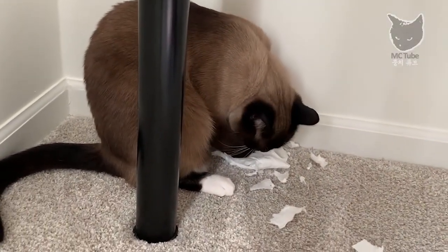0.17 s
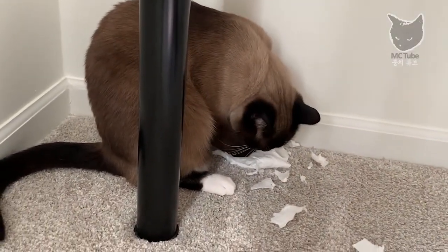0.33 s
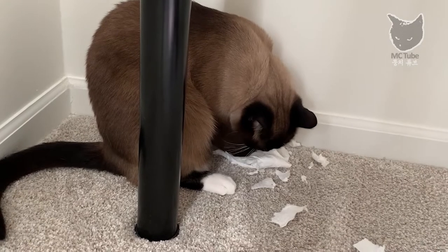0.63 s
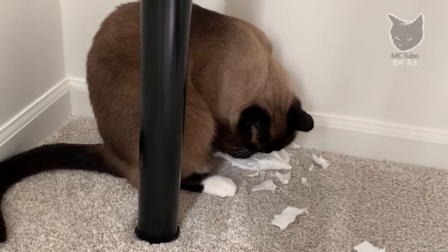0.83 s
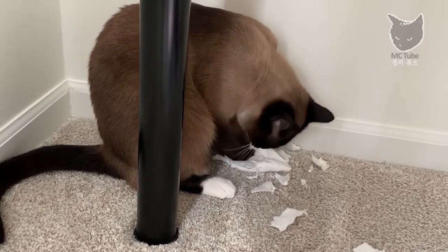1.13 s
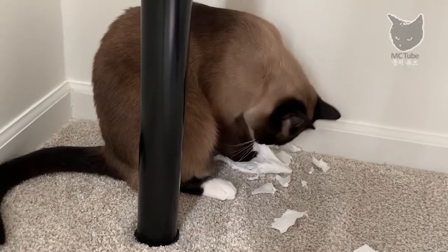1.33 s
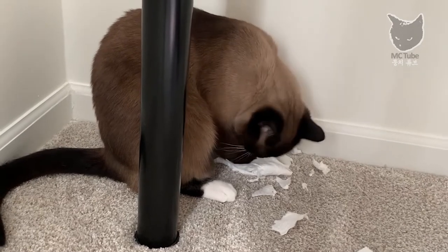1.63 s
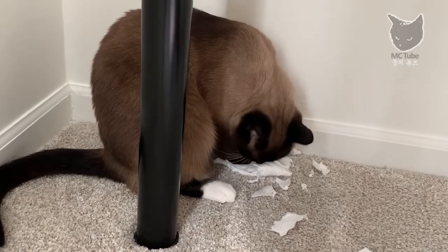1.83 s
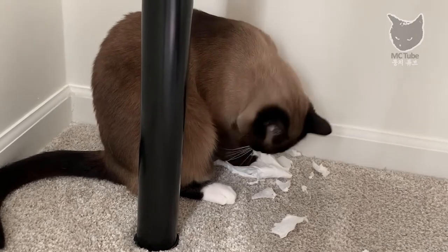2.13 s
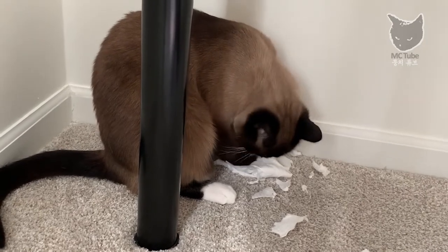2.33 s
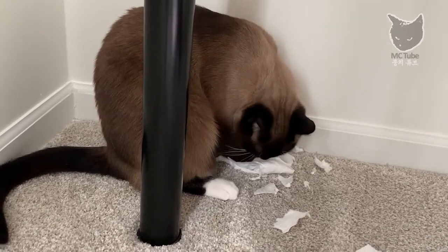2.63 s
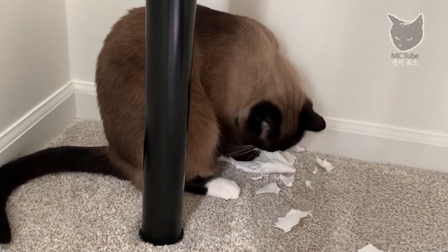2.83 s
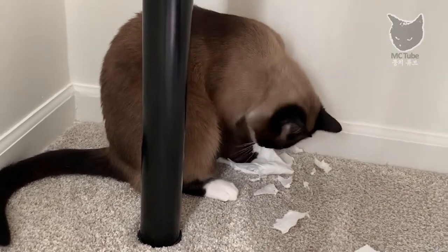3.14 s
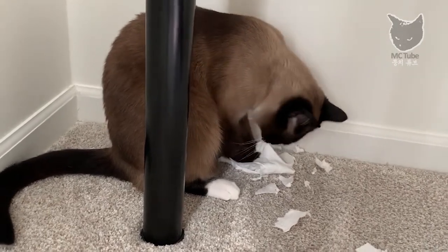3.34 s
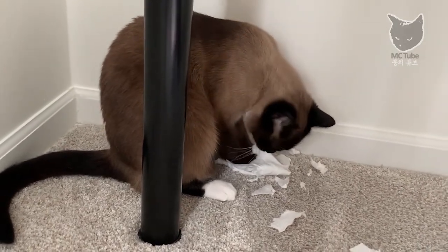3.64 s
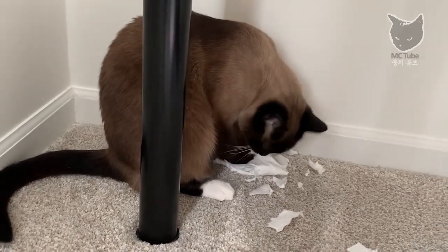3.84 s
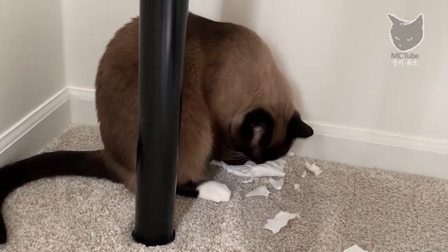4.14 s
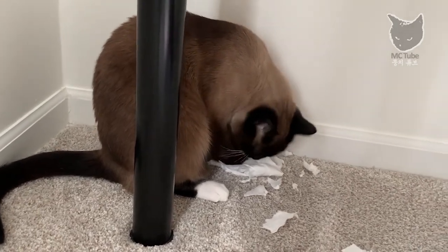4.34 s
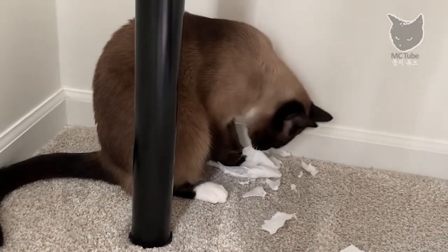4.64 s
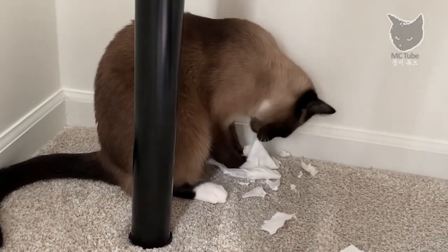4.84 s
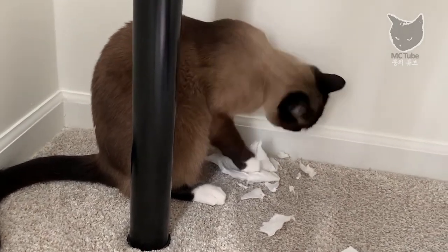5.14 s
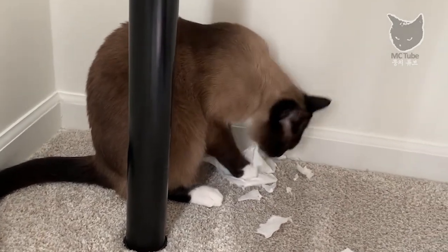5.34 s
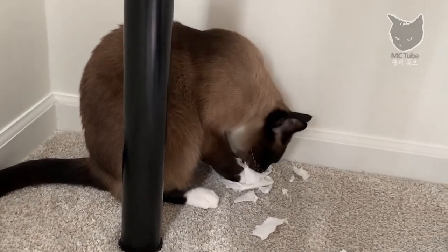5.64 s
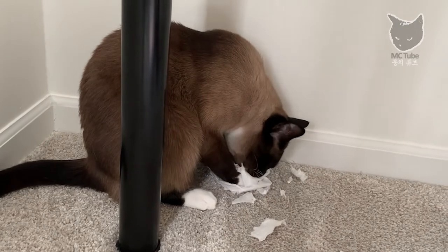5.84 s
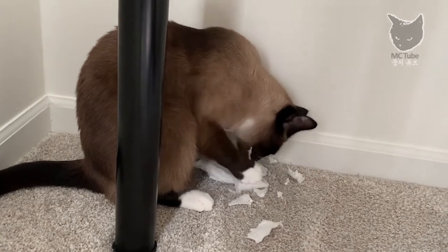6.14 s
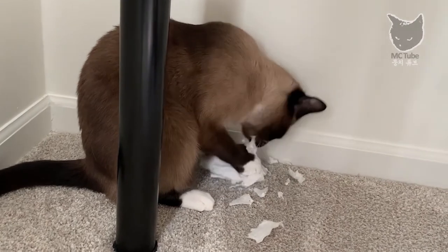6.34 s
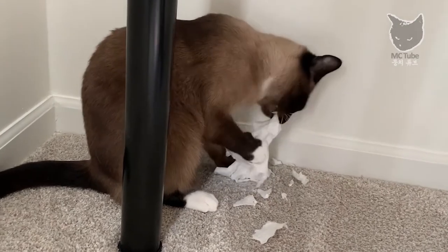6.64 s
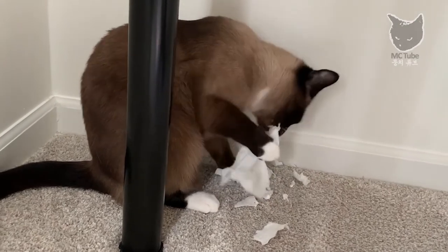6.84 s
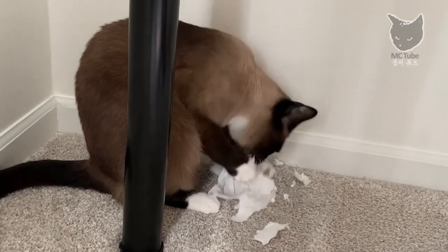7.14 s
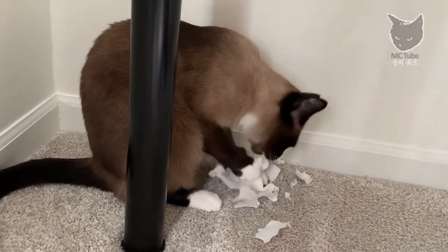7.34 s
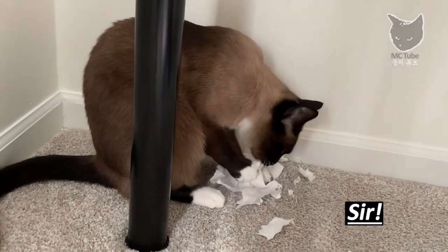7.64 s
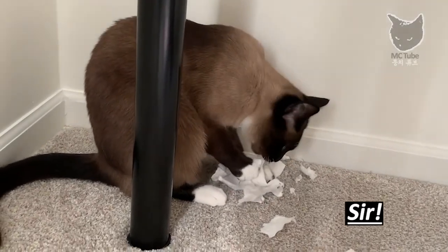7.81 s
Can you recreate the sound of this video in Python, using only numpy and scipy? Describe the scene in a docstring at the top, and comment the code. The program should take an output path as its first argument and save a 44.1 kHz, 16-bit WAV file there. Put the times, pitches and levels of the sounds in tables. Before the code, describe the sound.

Sparse bites and hollow snaps of soft paper give way to longer, crisp, uneven tearing by a cat, above steady low hum and rumble.

```python
"""A carpeted corner of a small room, a cat with a paper towel, a two-port microphone.
The first four seconds are nosing, bites and tugs: clumped clicks ring the sheet and the mouth hollow, short
bursts make hollow pops (a knot of them near 3 s) and low thumps of paws and room, and tooth squeaks glide.
Long rips of denser clicks follow from 4.3, 6 and 7.1 s, with wet ticks mostly from 5 to 6 s, then soft nosing.
Room echo follows each sound; mains hum, noise-driven rumble and a faint hiss run underneath throughout."""
import sys
import numpy as np
from scipy import signal
from scipy.fft import rfft, irfft, next_fast_len
from scipy.io import wavfile
from scipy.ndimage import uniform_filter1d

SR = 44100
rng = np.random.default_rng(int(sys.argv[2]) if len(sys.argv) > 2 else 0)


def to_wav(s):
    """Save 16-bit WAV."""
    ch = np.atleast_2d(s).T  # columns
    pcm = np.round(np.clip(ch, -1, 1) * 32767)  # PCM
    wavfile.write(sys.argv[1], SR, pcm.astype(np.int16))


N = 351544  # samples

# Long rips, one curve each: [t/s, tearing level/dB, fibres over creases/dB, wad over creases/dB,
# drag of sheet and paws on the carpet: level/dB]; the fibres get FIBRE_LIFT_DB on top
RIP_CURVES = [
    [(4.305, -77, 0, 2, -87), (4.36, -64.5, -3, 7.5, -71.5), (4.43, -68.5, -3.5, 6, -71),
     (4.475, -52.5, -12.5, 4, -45.5), (4.52, -47.5, -8, -0.5, -44), (4.58, -60, -1, 4.5, -71),
     (4.61, -47, -6, 1, -63), (4.684, -57, -0.5, 8, -59), (4.71, -47.5, -1.5, 7, -44.5),
     (4.75, -54, -2.5, 4, -49.5), (4.77, -50.5, -2, 3.5, -45.5), (4.814, -57.5, -3.5, 8.5, -51),
     (4.864, -42, 0, -1.5, -38.5), (4.895, -47, -2, -2, -43.5), (4.94, -51.5, -1, 6, -49.5),
     (4.956, -66, -8.5, 2.5, -55.5), (5.054, -81, 6.5, 2.5, -69.5)],
    [(5.96, -75.5, 0.5, 6, -59.5), (5.985, -55, -13.5, -7, -43), (6.02, -58, -5.5, -3.5, -53),
     (6.05, -57.5, -8, 6, -49.5), (6.12, -58, -4.5, 5, -58), (6.17, -53.5, -4, 5.5, -54),
     (6.19, -47, -2, 3.5, -46.5), (6.25, -45.5, 1, 3.5, -42), (6.31, -44, 2, 4, -37),
     (6.4, -41, 1, 2.5, -41.5), (6.44, -44, 2, 8.5, -34), (6.484, -45, -2.5, -0.5, -40),
     (6.531, -38.5, 4, 3.5, -41.5), (6.556, -40, 3, 2.5, -33.5), (6.625, -59.5, -5, 2.5, -62),
     (6.69, -61, -3.5, -2.5, -56.5), (6.73, -69, -1, 6.5, -58.5), (6.9, -77, 9.5, -1, -67.5)],
    [(7.1, -69.5, -1, 1.5, -66.5), (7.147, -65, 1, 2.5, -61), (7.195, -47.5, -4.5, 2, -41.5),
     (7.214, -54.5, -6, 0, -60), (7.26, -60, -8.5, 0, -57.5), (7.313, -58.5, -8.5, -1.5, -54.5),
     (7.383, -61.5, -9.5, -0.5, -58), (7.41, -73, -3, 3.5, -52), (7.46, -80.5, 0, 4, -75.5)],
]
# Single bites and tugs: [peak t/s, width for a 20 dB fall/s, chewing level/dB, creasing level/dB, drag level/dB]
BITES = [(0.16, 0.0519, -74, -77, -55.5), (0.79, 0.0388, -53.5, -62.5, -76), (0.83, 0.0459, -49, -57, -80),
         (0.864, 0.0392, -54, -58.5, -78), (0.96, 0.011, -68, -67, -74), (1.084, 0.0756, -57.5, -65, -67),
         (1.185, 0.0042, -59.5, -73.5, -61.5), (1.218, 0.0148, -48, -60, -47.5),
         (1.24, 0.04, -60.5, -76.5, -51), (1.816, 0.0875, -65, -74.5, -57.5),
         (1.985, 0.0443, -60.5, -67, -75), (2.012, 0.0005, -75, -66, -43.5),
         (2.052, 0.0088, -40.5, -60.5, -56), (2.084, 0.0761, -56, -76.5, -50.5),
         (2.575, 0.0573, -69.5, -80, -80), (2.654, 0.0851, -59.5, -73.5, -64),
         (2.75, 0.0615, -57, -66, -62.5), (3.013, 0.0338, -50, -59.5, -51.5), (3.083, 0.032, -53, -61, -78),
         (3.144, 0.0204, -40, -45.5, -50), (3.163, 0.022, -46.5, -48.5, -47.5),
         (3.23, 0.0283, -51.5, -62, -61.5), (3.252, 0.0329, -61, -75.5, -49.5),
         (3.607, 0.0933, -89, -86.5, -58.5), (3.906, 0.0065, -82, -84, -58),
         (4.21, 0.0556, -56.5, -72.5, -67), (5.81, 0.2736, -64, -66, -67.5),
         (7.01, 0.14, -65.5, -69.5, -64.5)]
# Soft nosing and mouthing between bites: [t/s, level/dB before the offsets below]
NOSING = [(0, -81), (0.22, -91), (0.65, -74.5), (0.72, -85.5), (0.97, -70.5), (1.17, -72), (1.3, -90),
          (1.75, -76), (1.95, -72), (2.2, -83.5), (2.53, -86.5), (2.62, -72), (2.82, -77), (2.98, -68),
          (3.3, -93), (3.9, -85.5), (4.03, -73.5), (4.15, -79), (5.15, -84.5), (5.45, -75.5), (5.75, -70),
          (5.93, -74), (6.8, -73), (7.1, -70), (7.56, -70), (7.75, -76.5), (7.97, -76.5)]
# Offsets of the nosing for creases, fibres, wad, drag: [level/dB]
NOSING_OFFSETS = [-3.5, -3.5, 2, 2]
# Spectrum of the creasing sheet: [f/Hz, relative level/dB per Hz]
CREASE_SPECTRUM = [(1750, -8), (2150, -2.5), (2600, -3.5), (3000, -4.5), (3350, -1.5), (3700, -3),
                   (4200, -1), (4750, -5.5), (5150, -4), (5600, -10.5), (6400, -6.5), (7500, -29)]
# Spectrum of the parting fibres: [f/Hz, relative level/dB per Hz]
FIBRE_SPECTRUM = [(4000, -22.5), (6500, 1), (7500, 1), (8500, 0.5), (10000, -1.5), (11500, -8),
                  (13500, -1.5), (15700, -7)]
# Hollow of mouth and wad, close to the wall: [f/Hz, width of one pass/Hz, relative level/dB]
MOUTH_MODES = [(770.47, 200.2, -9.5), (895.87, 333.66, 7.5), (1016.3, 155.52, 4.5), (1545.7, 235.1, 1)]
# Resonances of the dragging on carpet: [f/Hz, width of one pass/Hz, relative level/dB]
CARPET_MODES = [(167.79, 106.5, -2), (229.09, 101.42, 2), (291.28, 50.57, 0.5), (411.72, 87.62, -2)]
# Left-right likeness of the paper at the two ports: [f/Hz, likeness (no unit)]
PAPER_LIKENESS = [(200, 0.8349), (1000, 0.7189), (2400, 0.6251), (4400, 0.7148), (6200, 0.084),
                  (7600, 0.5478), (15800, 1)]
# The sheet snapping off the teeth: [t/s, peak level/dB, f/Hz, level of the fixed 1.5 kHz resonance/dB,
# crack level above 2 kHz/dB, thud level under 500 Hz/dB]
POPS = [(1.082, -45.5, 989.5, -64, -63, -56), (1.212, -19.5, 831.2, -39.5, -47, -38),
        (1.812, -52, 615.3, -69, -71, -53.5), (2.048, -16, 936.1, -26.5, -34.5, -22.5),
        (2.651, -42.5, 861.9, -70.5, -69, -62.5), (2.999, -40, 999.3, -63.5, -62.5, -59),
        (3.013, -37.5, 833.7, -64, -57, -44), (3.024, -36, 998.8, -63.5, -64, -55),
        (3.056, -46.5, 998, -69.5, -61, -59.5), (3.087, -43, 841.5, -69.5, -61, -64.5),
        (3.139, -29.5, 994.2, -47.5, -47, -39.5), (3.211, -49.5, 895.8, -64, -62, -52),
        (3.24, -29, 859.1, -43.5, -49, -31), (4.211, -46.5, 878, -67.5, -70, -69),
        (4.396, -44.5, 986.9, -61.5, -62.5, -65.5), (4.471, -47.5, 942.8, -48.5, -46, -41.5),
        (4.623, -38, 1081, -56.5, -49.5, -51.5), (4.862, -41, 691.8, -34, -39, -28.5),
        (5.983, -50, 660.7, -57.5, -53, -44.5), (6.051, -44, 676.2, -60.5, -58, -44.5),
        (6.143, -36.5, 976.3, -60.5, -54, -42), (6.554, -29, 793.3, -45.5, -37.5, -44),
        (7.194, -43.5, 1034, -63.5, -43.5, -30), (7.313, -50, 678.3, -63, -50, -55.5),
        (7.383, -54, 801.4, -63.5, -50, -55.5)]
# Resonances of the taut sheet: [f/Hz, width of one pass/Hz, relative level/dB]
CRACK_MODES = [(2798, 342, 1.5), (3712.2, 313.4, -2.5), (4896.2, 636, -12), (6648.2, 396.2, -4)]
# Small wet ticks of tongue and teeth: [t/s, peak level/dB, f/Hz]
TICKS = [(4.03, -56.5, 3000), (5.093, -55.5, 9816), (5.111, -48.5, 9106), (5.194, -46, 6709),
         (5.974, -52, 3301), (5.986, -39.5, 5261), (5.045, -58.5, 6990), (6.0, -54, 5050)]
# Faint squeaks of tooth on damp paper: [t/s, length/s, peak level/dB, start f/Hz, end f/Hz]
SQUEAKS = [(1.668, 0.0718, -65, 1990, 2240), (1.955, 0.06736, -66.5, 2160, 2177),
           (2.048, 0.0437, -57, 2195, 2104), (4.33, 0.04002, -62.5, 3350, 3196)]
# Low thumps: paws shifting weight, and the room's low boom after hard snaps and tugs: [t/s, peak level/dB, f/Hz]
LOW_THUMPS = [(0.158, -58, 152.7), (1.107, -34.5, 122.3), (2.007, -40.5, 219.9), (2.062, -31.5, 77.28),
              (3.254, -34, 79.97), (3.605, -31.5, 101.9), (3.909, -37.5, 104.5), (5.975, -30.5, 158.2),
              (6.034, -27.5, 69.16), (6.56, -32, 68.47)]
# Decay of the room echo: [f/Hz, t60/s]
ROOM_DECAY = [(200, 0.4846), (1000, 0.1225), (4000, 0.3051), (12000, 0.0726)]
# Low room modes: [f/Hz, width of one pass/Hz, relative level/dB]
ROOM_MODES = [(55.576, 6.893, -2.5), (72.703, 7.003, -3), (90.902, 11.907, -9), (115.3, 21.385, -14)]
# Left-right likeness of hiss and echo at the two ports: [f/Hz, likeness (no unit)]
DIFFUSE_LIKENESS = [(60, 0.929), (300, 0.5038), (1000, 0.094), (2000, 0.1022), (6000, 0.14), (7600, 1),
                    (15800, 1)]
# Spectrum of the hiss: [f/Hz, relative level/dB per Hz]
HISS_SPECTRUM = [(60, -21), (140, 4.5), (200, -9), (400, -12.5), (1000, -20), (3300, -25), (6800, -29),
                 (8800, -24), (11500, -27.5), (13500, -25), (15700, -34)]
# Phase lead of the right port, negative where it lags; in the treble it grows like a fixed
# path difference: [f/Hz, lead/radians]
PORT_LEAD = [(0, 0), (1000, -.45), (1700, -1.1), (2400, -.4), (3700, -.9), (5600, -.7), (7000, -2.6),
             (9300, 0), (14100, 6.28), (16000, 8.8)]

BITE_RISE, BITE_ROUND = 1.0697, 1.4948  # rise as a share of the width; roundness of the top
BITE_BRIGHT_DB, FIBRE_LIFT_DB = -3.5, 2.5  # fibres over creases in a bite; lift of all fibres
MAINS_HZ, MAINS_DB = 59.901, -44  # f/Hz, rms level/dB before its slow wander
RUMBLE_DB, HISS_DB = -41, -62  # levels/dB ahead of the microphone's filters
EDGE_HZ = 15800  # upper band limit


def paper():
    """Clumped clicks drive the creasing sheet, the parting fibres, the mouth hollow and the carpet."""
    crease_gain, fibre_gain, wad_gain, drag_gain = effort()
    slips = lumps(0.004049, 1.2606)  # the tear runs in jerks
    # a fast rip packs the clicks into a finer grain
    pace = np.clip(fibre_gain / gain_of(-46), .25, 3)
    creases = colour(grains(6000 * pace, 1.7425), CREASE_SPECTRUM)
    creases = evened(patches(creases, 2.845)) * crease_gain * slips
    fibres = colour(grains(12000, 4.586), FIBRE_SPECTRUM)
    fibres = evened(patches(fibres, 2.848)) * fibre_gain * gain_of(FIBRE_LIFT_DB) * slips
    wad = evened(modes(grains(2500 * pace, 2.444), MOUTH_MODES))
    wad = wad * wad_gain * slips * lumps(0.0033, 0.462)
    drag = evened(modes(grains(600, 3.4246), CARPET_MODES))
    drag = drag * drag_gain * lumps(0.00629, 1.657)
    left, twin = creases + fibres + wad + drag
    return pair(left, twin, PAPER_LIKENESS)


def effort():
    """Gains of creases, fibres, wad and drag: the loudest of nosing, bites and rips at each moment."""
    t = np.arange(0, N / SR + .002, 1 / 1000)
    db = np.interp(t, *np.transpose(NOSING)) + np.c_[NOSING_OFFSETS]
    for s, width, chew_db, crease_db, drag_db in BITES:
        away = np.where(t < s, (s - t) / BITE_RISE, t - s)
        fall = 20 * (away / width) ** BITE_ROUND
        peaks = np.c_[[crease_db, crease_db + BITE_BRIGHT_DB, chew_db, drag_db]]
        db = np.maximum(db, peaks - fall)
    for curve in RIP_CURVES:
        s, *columns = np.transpose(curve)
        tear, fibres, wad, drag = (np.interp(t, s, column) for column in columns)
        louder = np.maximum(db, [tear, tear + fibres, tear + wad, drag])
        db = np.where((t > s[0]) & (t < s[-1]), louder, db)
    return [gain_of(np.interp(np.arange(N) / SR, t, row)) for row in db]


def pops():
    """A short hollow pop with a fixed higher ring near 1.5 kHz, a crack of the taut sheet, then a soft thud."""
    out = np.zeros(N)
    click = np.zeros(400)
    click[0] = 1
    crack = modes(click, CRACK_MODES)
    crack /= abs(crack).max()
    for s, db, hz, ring_db, crack_db, thud_db in POPS:
        add(out, s - .0006, gain_of(db) * burst(hz, 4.68))
        add(out, s - .0003, gain_of(ring_db) * burst(1510.9, 6.835))
        add(out, s, gain_of(crack_db) * crack)
        add(out, s + 0.0022976, gain_of(thud_db) * burst(265.5, 1.1173))
    return out


def ticks():
    """Tongue and teeth part wetly: each tick is a dozen high cycles."""
    out = np.zeros(N)
    for s, db, hz in TICKS:
        add(out, s, gain_of(db) * burst(hz, 12.63))
    return out


def squeaks():
    """Tooth slides on damp paper: a short sine glide with an unsteady pitch."""
    out = np.zeros(N)
    for s, length, db, start_hz, end_hz in SQUEAKS:
        glide = np.linspace(start_hz, end_hz, round(length * SR))
        # the slip stutters, 90 Hz rms
        glide += 90 * evened(uniform_filter1d(rng.standard_normal(len(glide)), size=120))
        tone = np.sin(2 * np.pi * np.cumsum(glide) / SR)
        add(out, s, gain_of(db) * tone * np.hanning(len(glide)))
    return out


def low_thumps():
    """Paws shift weight, or the room booms low after a hard snap or tug: about three low cycles each."""
    out = np.zeros(N)
    for s, db, hz in LOW_THUMPS:
        add(out, s, gain_of(db) * burst(hz, 2.9084))
    return out


def room(x):
    """Echo as sparse taps of random sign, each band dying at its own speed, other taps per port."""
    taps = np.zeros((2, SR // 2))
    # one tap in every 20 samples
    at = np.arange(200, SR // 2 - 20, 20) + rng.integers(0, 20, (2, (SR // 2 - 201) // 20))
    np.put_along_axis(taps, at, rng.choice([-1., 1.], at.shape), 1)
    hz, t, z = signal.stft(taps, SR, nperseg=256)
    decay = gain_of(-60 * t / read(ROOM_DECAY, hz)[:, None])
    tail = signal.istft(z * decay, SR, nperseg=256)[1]
    return signal.fftconvolve(x, tail / np.linalg.norm(tail[0]), axes=1)[:, :N]


def rumble():
    """The building's low rumble: noise in the low room modes, nearly alike at both ports."""
    a, b = rng.standard_normal((2, N))
    noise = np.array([a + 0.2509 * b, a - 0.0814 * b])
    return gain_of(RUMBLE_DB) * evened(modes(noise, ROOM_MODES)) * lumps(0.0873, 1.982)


def mains_hum():
    """One sine at the mains frequency, its level wandering slowly, the same at both ports."""
    t = np.arange(N) / SR
    tone = np.sqrt(2) * np.sin(2 * np.pi * MAINS_HZ * t)
    return gain_of(MAINS_DB) * tone * lumps(0.3471, 2.573)


def hiss():
    """Steady coloured noise, its likeness between the ports set by frequency."""
    c, d = rng.standard_normal((2, N))
    return gain_of(HISS_DB) * evened(colour(pair(c, d, DIFFUSE_LIKENESS), HISS_SPECTRUM))


def gain_of(db):
    """dB to gain."""
    return 10 ** (np.asarray(db) / 20)


def evened(x):
    """Scales to rms 1."""
    return x / np.sqrt(np.mean(x ** 2) + 1e-20)


def read(points, hz):
    """Reads a spectrum table on a log-frequency axis."""
    f, value = np.transpose(points)
    return np.interp(np.log(hz + 1), np.log(f + 1), value)


def add(mix, s, sound):
    """Mixes a sound in at s seconds."""
    part = mix[round(s * SR):][:len(sound)]
    part += sound[:len(part)]


def modes(x, table):
    """Sum of resonances, each applied twice for dark valleys between them."""
    out = 0
    for hz, width, db in table:
        pole = np.exp((2j * np.pi * hz - np.pi * width) / SR)
        b, a = [1 - abs(pole)], [1, -pole]
        once = signal.lfilter(b, a, x, axis=-1)
        out = out + gain_of(db) * signal.lfilter(b, a, once, axis=-1).real
    return out


def colour(x, points):
    """Filters by a spectrum table."""
    size = next_fast_len(x.shape[-1])
    gain = gain_of(read(points, np.fft.rfftfreq(size, 1 / SR)))
    return irfft(rfft(x, size) * gain, size)[..., :x.shape[-1]]


def patches(x, depth_db):
    """Colour that drifts as the sheet changes shape: random patches over time and frequency."""
    z = signal.stft(x, SR, nperseg=512, noverlap=384)[2]
    field = rng.standard_normal(z.shape[-2:])
    field = uniform_filter1d(field, size=3, axis=0)
    field = evened(uniform_filter1d(field, size=24, axis=1))
    return signal.istft(z * gain_of(depth_db * field), SR, nperseg=512, noverlap=384)[1][..., :N]


def pair(x, other, points):
    """Two microphone ports: the right one hears a share of the left and a share of a second signal."""
    size = next_fast_len(N)
    same = np.clip(read(points, np.fft.rfftfreq(size, 1 / SR)), -1, 1)
    right = irfft(same * rfft(x, size) + np.sqrt(1 - same ** 2) * rfft(other, size), size)
    return np.array([x, right[:N]])


def lumps(seconds, depth_db):
    """Random gain that wanders on the given time scale."""
    size = max(round(seconds * SR), 2)
    smooth = uniform_filter1d(uniform_filter1d(rng.standard_normal(N), size), size)
    return gain_of(depth_db * evened(smooth))


def grains(per_s, spread_db):
    """Two sparse trains of clicks of random sign, a few of them large, at steady mean power."""
    size = gain_of(spread_db * np.minimum(rng.exponential(1, (2, N)), 4))
    signed = size * rng.choice([-1., 1.], (2, N))
    return signed * (rng.random((2, N)) < per_s / SR) / np.sqrt(per_s)


def burst(hz, cycles):
    """A few cycles swelling and dying, peak about 1."""
    t = np.arange(round(cycles * SR / hz)) / SR
    return np.sin(2 * np.pi * hz * t) * np.sin(np.pi * t * hz / cycles) ** 2


def scene():
    """The cat in its corner, the room's answer and the background."""
    hits = pops() + ticks() + squeaks() + low_thumps()
    hits = hits * gain_of([[.3], [-.3]])  # slightly louder at the left port
    sheet = paper()
    echo = pair(*room(gain_of(-15.5) * hits + gain_of(-17) * sheet), DIFFUSE_LIKENESS)
    # hits and paper all set the low room modes ringing
    boom = gain_of(14.0) * modes(hits + sheet, ROOM_MODES)
    return hits + sheet + echo + boom + rumble() + mains_hum() + hiss()


def record(dry):
    """The microphone: phase between its two ports, the bass roll-off, then the band limit."""
    size = next_fast_len(N + 4096)
    lead = np.interp(np.fft.rfftfreq(size, 1 / SR), *np.transpose(PORT_LEAD))
    turn = np.exp(.5j * np.array([-lead, lead]))  # half the lead on each port
    ports = irfft(rfft(dry, size) * turn, size)[:, :N]
    ports = signal.sosfilt(signal.butter(2, 36, "high", fs=SR, output="sos"), ports)
    band = signal.firwin(511, EDGE_HZ, window=("kaiser", 9), fs=SR)
    return signal.oaconvolve(ports, band[None], "same")


dry = scene()
out = record(dry)
to_wav(out)
```